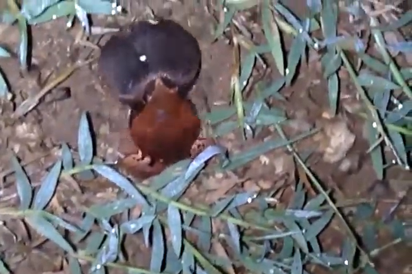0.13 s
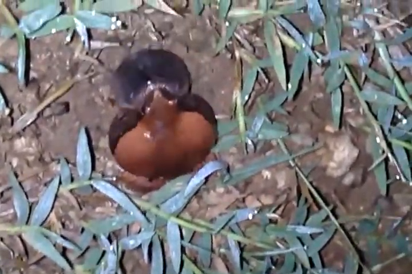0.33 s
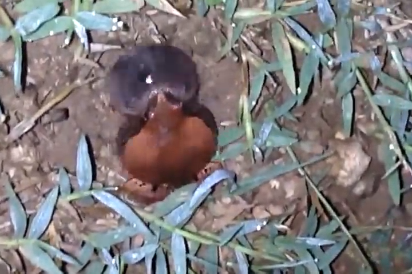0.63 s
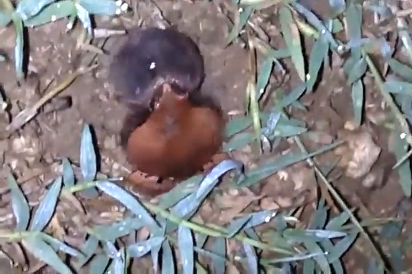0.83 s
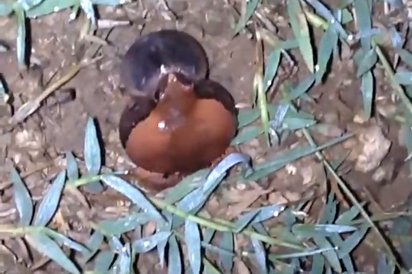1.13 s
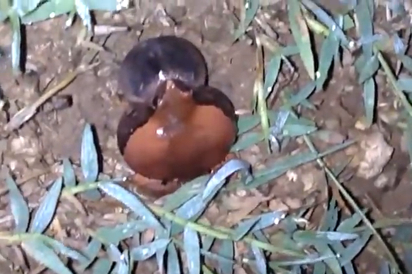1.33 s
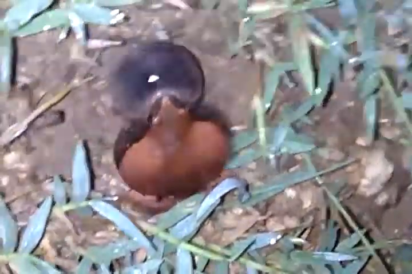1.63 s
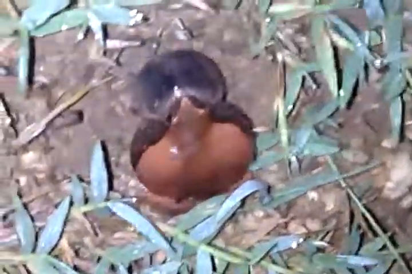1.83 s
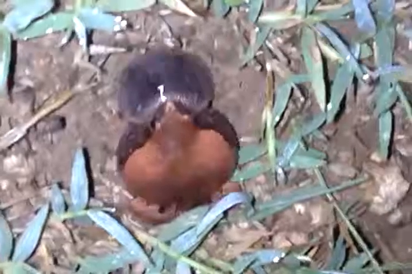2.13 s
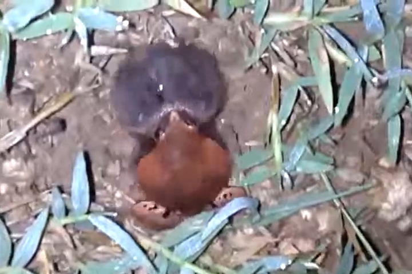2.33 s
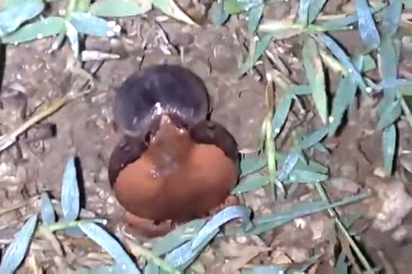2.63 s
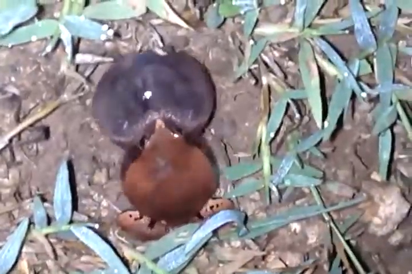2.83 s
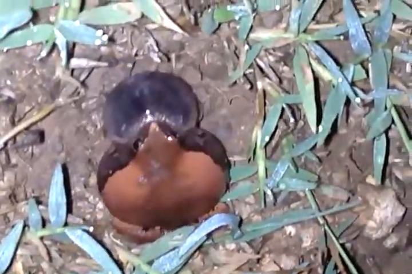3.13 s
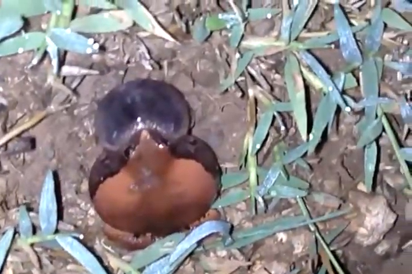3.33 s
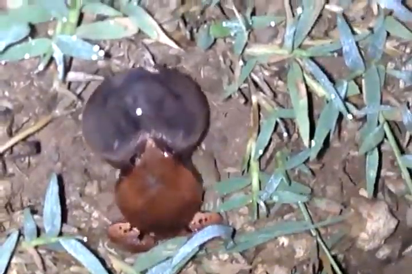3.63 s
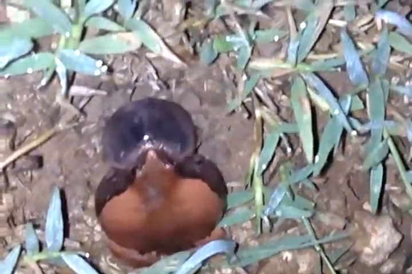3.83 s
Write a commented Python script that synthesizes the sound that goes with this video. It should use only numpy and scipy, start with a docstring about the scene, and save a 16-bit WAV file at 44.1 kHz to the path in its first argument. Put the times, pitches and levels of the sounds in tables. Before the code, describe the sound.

Loud, rasping croaks come six times from a frog on wet ground right under the microphone, each slightly distorted. High trills, fainter answering croaks and quick ticks from other frogs fill the gaps, above a faint chorus and low rumble.

```python
"""On wet ground at night, a frog croaks six times right under the microphone and overloads it.
Each croak is a quick run of double pulses that ring its throat and vocal sac (its air pouch).
Other frogs trill nearby with fast, even pulses, and wet grass snaps.
Farther frogs croak, tick and rattle over the hiss of a distant chorus and a low rumble."""
import sys
import numpy as np
from scipy import signal
from scipy.fft import rfft, irfft, next_fast_len
from scipy.io import wavfile
from scipy.ndimage import map_coordinates

SR = 44100
rng = np.random.default_rng(int(sys.argv[2]) if len(sys.argv) > 2 else 0)


def log_audio(samples):
    """Write samples as a 16-bit WAV file to the path given in sys.argv[1]."""
    # one column per channel
    frames = np.atleast_2d(samples).T
    # limit to full scale, then quantise
    limited = np.clip(frames, -1, 1)
    pcm = np.round(limited * 32767).astype(np.int16)
    wavfile.write(sys.argv[1], SR, pcm)


N = 176400
TIME = np.arange(N) / SR


def amp(db):
    """Turn decibels into a factor to multiply by."""
    return 10 ** (np.asarray(db) / 20)


def unit(x):
    """Scale x to an average (rms) strength of 1."""
    return x / np.sqrt(np.mean(x ** 2) + 1e-20)


def add(track, s, x):
    """Mix x into the track at s seconds."""
    i = max(0, round(s * SR))
    track[i:i + len(x)] += x[:max(0, len(track) - i)]


def wobble(rate):
    """A smooth curve through rate random points a second."""
    return map_coordinates(rng.standard_normal(int(N * rate / SR) + 4), [TIME * rate])


def gain_at(hz, colour):
    """Read the gain at hz from a tone colour: rows of f/Hz, level/dB."""
    f, db = np.transpose(colour)
    return amp(np.interp(np.log(hz + 1), np.log(f), db))


def filtered(x, response):
    """Multiply each frequency in x by response(hz)."""
    size = next_fast_len(N + SR // 2)
    return irfft(rfft(x, size) * response(np.fft.rfftfreq(size, 1 / SR)), size)[:N]


def noise(colour):
    """Noise of strength 1 with the given tone colour."""
    return unit(filtered(rng.standard_normal(N), lambda hz: gain_at(hz, colour)))


def ring(modes, rise_s, swoop=0, swoop_s=.00025):
    """A pulse rings modes: tones that fade 60 dB in t60 seconds. With swoop they slide up to pitch."""
    t = np.arange(SR // 25) / SR
    turn = 2 * np.pi * (t - swoop * swoop_s * (1 - np.exp(-t / swoop_s)))
    tones = sum(amp(db - 60 * t / t60) * np.sin(hz * turn) for hz, db, t60 in modes)
    return (1 - np.exp(-t / rise_s)) * tones


def night_chorus():
    """Many far frogs blur into a fluttering hiss over a low rumble."""
    # tone colours of the hiss and the rumble: f/Hz, level/dB
    hiss_colour = [(100, -28), (450, -22), (750, -25.5), (1000, -11.5), (1300, -10), (1700, -16.5),
                   (2150, -5), (2450, -10), (3300, 1), (3850, -16), (4400, -27), (5300, -35), (6400, -24.5),
                   (8500, -44), (16000, -52)]
    rumble_colour = [(20, 4), (55, 4), (100, -6.5), (190, -10.5), (300, -19), (500, -44.5)]
    flutter = amp(2.6 * wobble(170) + .27 * wobble(8.19))
    return amp(-27) * flutter * noise(hiss_colour) + amp(-36) * noise(rumble_colour)


def trilling_frogs():
    """Fast, even pulses ring a narrowly tuned sac; more effort lifts loudness and pitch."""
    # trills: start t/s, length/s, level/dB, pulse rate factor, sac f/Hz, fade-out/s
    trills = [(-.28, .66, -14.5, 1.005, 3770, .24), (.41, .5, -25, .985, 3520, .1),
              (.825, .56, -14, 1.0, 3770, .055), (1.92, .62, -14, 1.012, 3760, .19),
              (2.03, .57, -24, .95, 3600, .14), (2.985, .58, -14.3, 1.0, 3770, .09),
              (3.5, .6, -22, .99, 3590, .1), (3.68, .5, -27, 1.03, 3650, .1)]
    # usual pulse rate during a trill: t/s from its start, rate/Hz
    pulse_rate = [(0, 150), (.06, 155.5), (.13, 157.3), (.26, 153.3), (.41, 151.2), (.52, 149.5),
                  (.66, 147)]
    # how strongly the sac rings: f/Hz from its centre, level/dB
    sac = [(-1100, -52.5), (-620, -15), (-420, -15.5), (-250, 3), (-7.5, 3), (199, 4), (364, -16.5),
           (538.5, -8.5), (756, -29), (998.5, -34.5), (1294, -63)]
    attack_s, tiring_db_per_s, sag_hz, sweep_s_per_hz = .071, 8, 423, 1.4e-6
    harmonics = np.arange(16, 34)[:, None]  # whole multiples of the pulse rate
    out = np.zeros(N)
    for start, length, db, pace, hz, release in trills:
        on = (TIME > start) & (TIME < start + length)
        t = TIME[on] - start
        effort = (1 - np.exp(-t / attack_s)) * np.minimum((length - t) / release, 1)
        rate = pace * np.interp(t, *np.transpose(pulse_rate)) * (1 + .003 * wobble(90)[on])
        off_centre = harmonics * rate - hz + sag_hz * (1 - effort)
        gains = amp(np.interp(off_centre, *np.transpose(sac)))
        sweep = np.pi * sweep_s_per_hz * off_centre ** 2  # each pulse falls in pitch
        phase = 2 * np.pi * harmonics * np.cumsum(rate) / SR + sweep
        pulses = unit(np.sum(gains * np.cos(phase), axis=0))
        level_db = db - tiring_db_per_s * (t - length / 2) + .3 * wobble(89)[on]
        out[on] += amp(level_db) * effort * pulses
    return out


def croak(hiss, count, spacing, last_db):
    """Double pulses speed up and ring the throat; its low tone fades as a rising upper one takes over."""
    # throat tones over a croak: start f/Hz, end f/Hz, start, middle and end level/dB, t60/s
    throat = [(995.7, 995, -2.5, -10, -27, .027), (1320, 1430, -10, -10, -26, 0.011),
              (1959, 2084.5, 0, 6, 3.5, 0.012), (2760, 5100, -19.5, -14.5, -38.5, 0.0068)]
    # second strike of a pulse against the first: level/dB at the croak's start, middle and end
    second_db = (-6, 5.5, -2.5)
    gap_s, second_delay_s, push_s, hiss_fade_s = .0139, .0045, .0029, .0094

    def glide(values, pulse):
        """Move through the values over the first ten pulses."""
        return np.interp(min(pulse / 9, 1), np.linspace(0, 1, len(values)), values)

    out, s = np.zeros(SR // 4), 0
    t = np.arange(SR // 25) / SR
    sac_push = amp(-26) * t / push_s * np.exp(1 - t / push_s)  # the sac jerks outward at each pulse
    for k in range(count):
        size = amp(last_db if k == count - 1 else 0)
        strikes = [(0, 0), (second_delay_s * (1 + .056 * rng.normal()), glide(second_db, k))]
        for delay, db in strikes[:1 if k == 10 else 2]:  # an eleventh pulse strikes only once
            modes = []
            for start_hz, end_hz, *levels, t60 in throat:
                hz = glide((start_hz, end_hz), k) * (1 + .006 * rng.normal())
                modes.append((hz, glide(levels, k) + 1.92 * rng.normal(), t60))
            rasp = amp(-33 - 60 * t / .04) * hiss[rng.integers(N // 2):][:len(t)]
            add(out, s + delay, size * amp(db) * (rasp - ring(modes, rise_s=.0004, swoop=.45)))
        add(out, s, -size * sac_push)
        s += spacing * (gap_s + .002 * np.exp(-k / 3.5))  # the first gaps are longer
    # a faint hiss fills the gaps between the pulses, then fades
    fade = np.exp(-np.maximum(np.arange(len(out)) / SR - s + gap_s, 0) / hiss_fade_s)
    gap_hiss = amp(-33) * fade * hiss[rng.integers(N // 2):][:len(out)]
    return out + gap_hiss


def croaking_frogs():
    """Two tracks: the near frog, and those that answer it, dulled by the grass."""
    # near croaks: t/s, pulse count, pulse spacing factor, level/dB, change on the last pulse/dB
    croaks = [(.0768, 11, 0.98, 15, -11.5), (0.7061, 10, 0.99, 14.5, -5.5), (1.4864, 10, 1.005, 15.5, -4),
              (2.2272, 11, .985, 16.5, -7.5), (2.8344, 11, .995, 15, -9), (3.582, 11, 1.012, 15.5, -10)]
    # answering croaks: t/s, level/dB
    answers = [(.265, -14.5), (0.586, -19), (.93, -15.5), (1.122, -26), (1.31, -19.5), (1.654, -14.5),
               (1.999, -28.5), (2.383, -15), (3.081, -46), (3.768, -17.5)]
    # tone colours of a croak's rasp and of the path through the grass: f/Hz, level/dB
    rasp_colour = [(100, -32), (700, 10), (2500, -8), (5000, -16.5), (10000, -13), (16000, -27)]
    through_grass = [(300, -34.5), (700, -10), (1000, -0.5), (1400, 1.5), (2100, -3.5), (3000, -7),
                     (5000, -29)]
    near, far, hiss = np.zeros(N), np.zeros(N), noise(rasp_colour)
    for s, count, spacing, db, last_db in croaks:
        add(near, s, amp(db) * croak(hiss, round(count), spacing, last_db))
    for s, db in answers:
        add(far, s, amp(db) * croak(hiss, count=11, spacing=1, last_db=-2))
    return near, filtered(far, lambda hz: gain_at(hz, through_grass))


def clicks(bouts, modes, rate_hz, rise_s, detune):
    """Runs of evenly spaced ringing clicks, each a little different in pitch and level."""
    out = np.zeros(N)
    for start, end, db in bouts:
        for k, chance in enumerate(rng.standard_normal((40, len(modes) + 1))):
            s = start + k / rate_hz
            if s < end:
                pitch = 1 + detune * chance[-1]
                click = [(hz * pitch, level + .83 * c, t60) for (hz, level, t60), c in zip(modes, chance)]
                add(out, s, amp(db) * ring(click, rise_s))
    return out


def ticking_frog():
    """A small frog ticks with quick, high clicks."""
    # runs of ticks: start t/s, end t/s, level/dB
    bouts = [(.2, .36, -21), (.45, .7, -27), (1.01, 1.3, -25.5), (1.39, 1.96, -26), (2.408, 2.62, -17.5),
             (2.712, 3.32, -30), (3.425, 3.87, -15)]
    # tones in a tick: f/Hz, level/dB, t60/s
    modes = [(3302, 14.5, 0.009), (6320, -10.5, 0.01)]
    return clicks(bouts, modes, rate_hz=38.3, rise_s=.0015, detune=.012)


def rattling_frog():
    """Another frog rattles with slower, lower clicks."""
    # rattles: start t/s, end t/s, level/dB
    bouts = [(.42, .56, -33), (1.02, 1.47, -24), (1.67, 2.2, -19.5), (2.557, 2.82, -22), (3.02, 3.58, -37)]
    # tones in a click: f/Hz, level/dB, t60/s
    modes = [(1183, 4.5, 0.0077), (1480, -7.5, 0.0043), (2783, 4.5, 0.023)]
    return clicks(bouts, modes, rate_hz=24.2, rise_s=.0008, detune=.02)


def grass_snaps(t60_s=.008):
    """Wet grass snaps in tiny bursts of bright noise."""
    # snaps: t/s, level/dB
    snaps = [(.965, -43), (1.002, -29.5), (2.166, -27), (2.2, -28.5), (2.213, -34)]
    # their tone colour: f/Hz, level/dB
    colour = [(1000, -19), (4000, -6.5), (9000, 2.5), (16000, -7)]
    bursts = sum((TIME > s) * amp(db - 60 * np.abs(TIME - s) / t60_s) for s, db in snaps)
    return bursts * noise(colour)


def grass_echo(x, t60_s=.11):
    """Sound scatters off the grass and the ground, leaving a short tail."""
    t = np.arange(SR // 2) / SR
    tail = rng.standard_normal(len(t)) * amp(-60 * t / t60_s) * (t > .002)
    return signal.fftconvolve(x, tail / np.linalg.norm(tail))[:N]


def scene():
    """Mix it all; the farther the frog, the more of its sound comes scattered through the grass."""
    near, answers = croaking_frogs()
    trills = trilling_frogs()
    far = answers + ticking_frog() + rattling_frog()
    echo = grass_echo(amp(-33) * near + amp(-16) * trills + amp(-12) * far)
    return (near + trills + far + echo + grass_snaps() + night_chorus())[None]


def record(dry):
    """Overload flattens the loud peaks; the recorder then colours the tone and trims lows and highs."""
    # the recorder's tone colour: f/Hz, level/dB
    colour = [(60, -1), (250, -3), (500, -6.5), (780, -5.5), (1000, -0.5), (1500, 5.5), (2100, -3.5),
              (3700, 0.5), (6200, -3.5), (8000, -3), (10200, -5), (16000, -3)]
    hardness, low_cut_hz, top_hz = 18, 33, 17000
    x = dry[0]
    ceiling = np.where(x > 0, .72, .86)  # upward swings flatten sooner than downward ones
    flattened = x / (1 + np.abs(x / ceiling) ** hardness) ** (1 / hardness)
    low_cut = lambda hz: 1j * hz / (low_cut_hz + 1j * hz)
    return filtered(flattened, lambda hz: gain_at(hz, colour) * low_cut(hz) * (hz < top_hz))[None]


dry = scene()
out = record(dry)
log_audio(out)
```